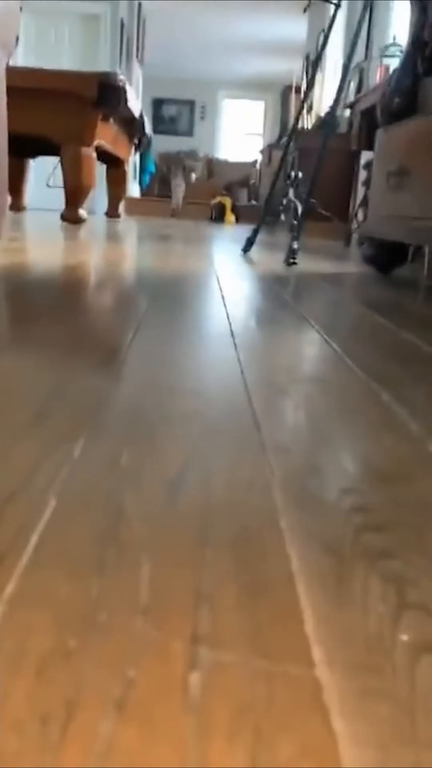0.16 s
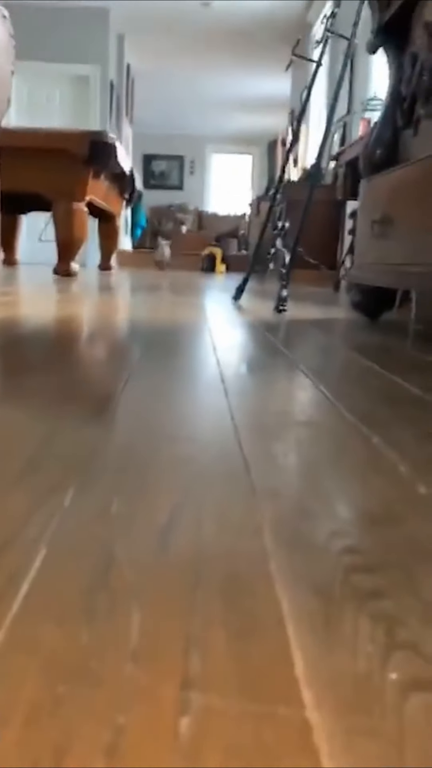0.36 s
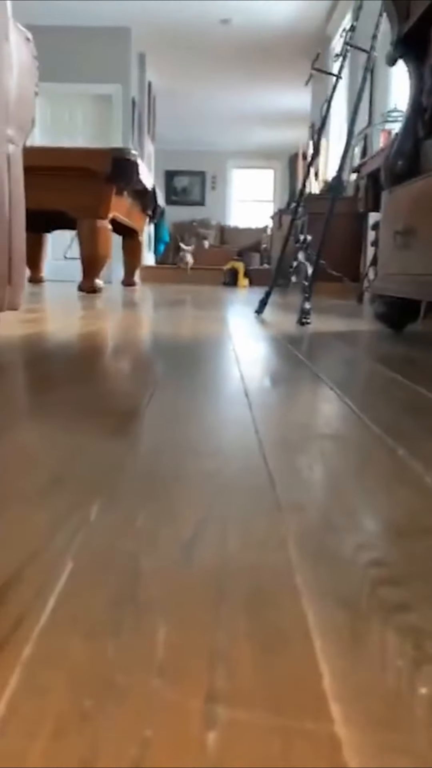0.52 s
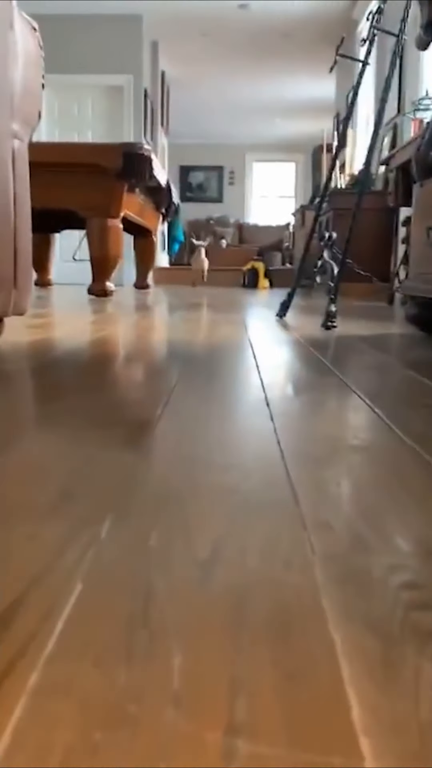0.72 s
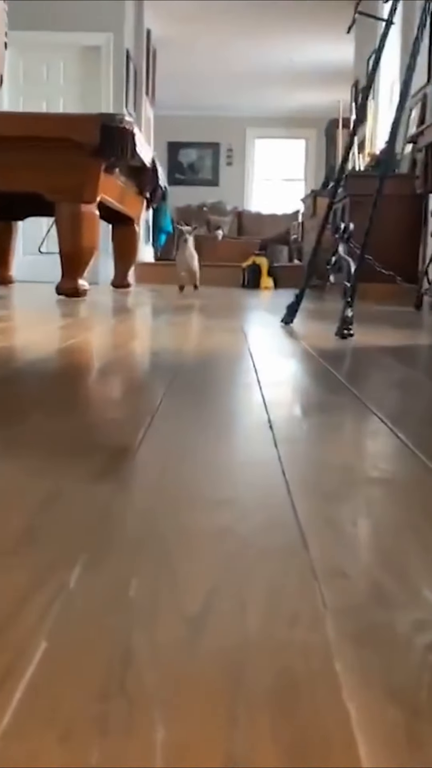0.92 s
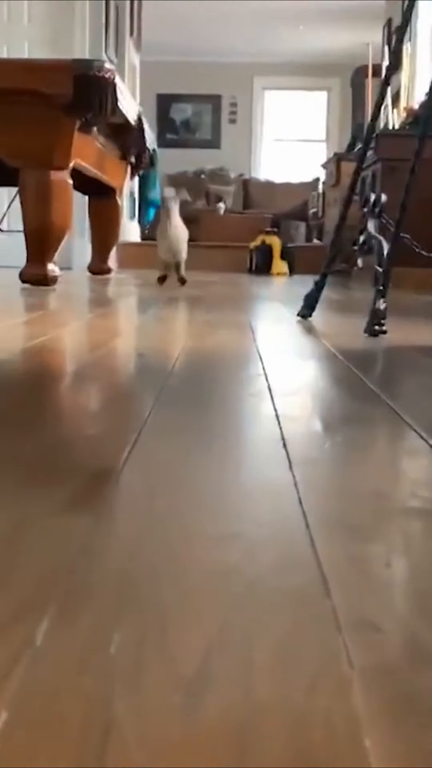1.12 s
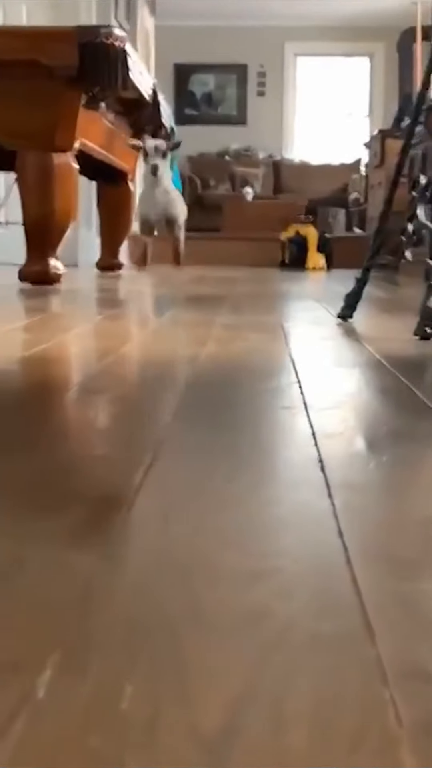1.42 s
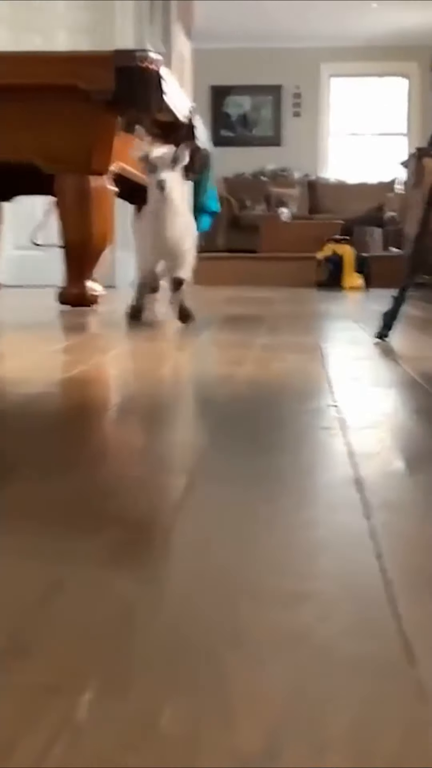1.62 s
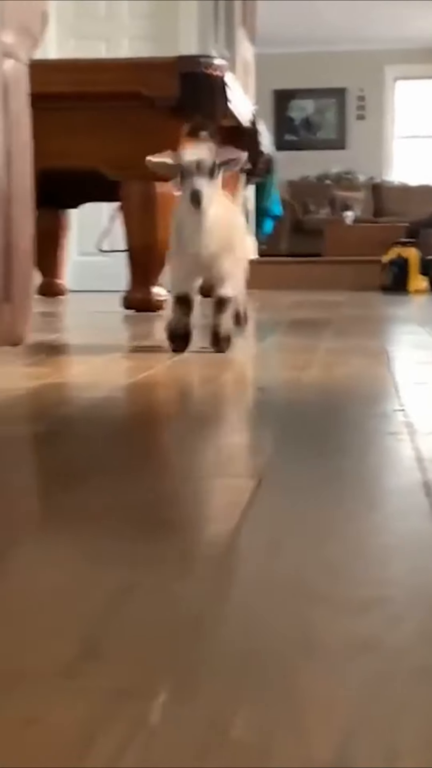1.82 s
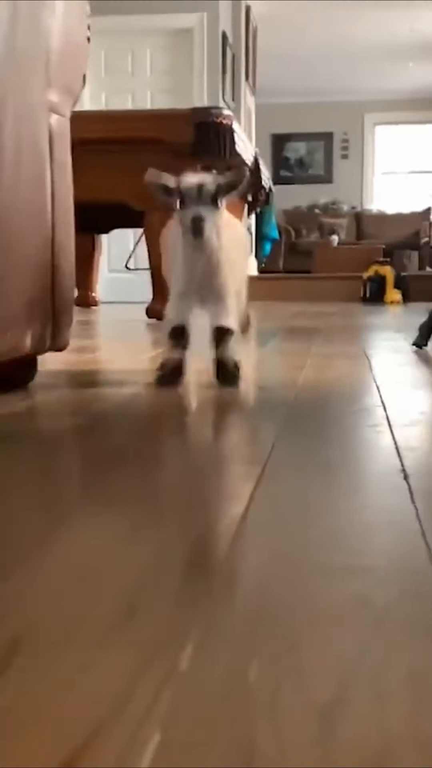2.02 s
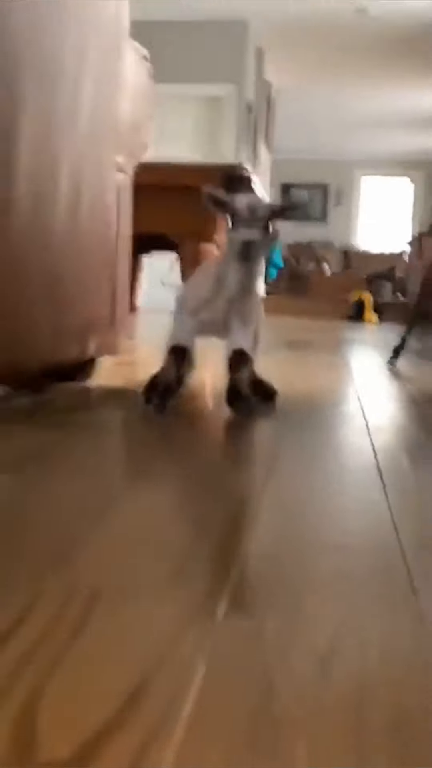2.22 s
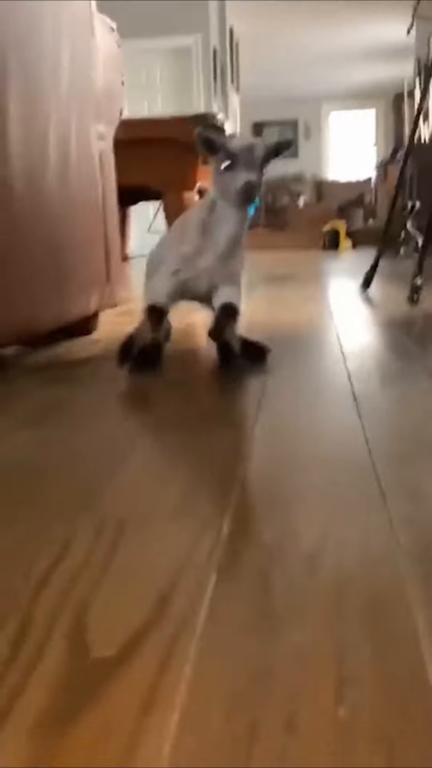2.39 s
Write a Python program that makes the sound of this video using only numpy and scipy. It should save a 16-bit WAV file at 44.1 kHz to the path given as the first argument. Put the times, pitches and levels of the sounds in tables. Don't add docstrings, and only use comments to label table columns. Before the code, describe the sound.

A small goat's hooves bound across a hardwood floor, in quick clustered clacks and hollow knocks, growing louder and nearer, then a faint last step; a sharp tick by the low phone microphone comes early, over quiet room hum.

```python
import sys
import numpy as np
from scipy import signal
from scipy.fft import rfft, irfft
from scipy.io import wavfile
from scipy.ndimage import uniform_filter1d

SR = 44100
rng = np.random.default_rng(int(sys.argv[2]) if len(sys.argv) > 2 else 0)


def volts(x):
    e = np.asarray(x, float) / 20
    return 10 ** e


def master(y):
    cut = np.clip(np.atleast_2d(y).T, -1, 1)
    pcm = np.round(cut * 32767)
    wavfile.write(sys.argv[1], SR, pcm.astype(np.int16))


N = 112454


def read(points, hz):
    f, value = np.transpose(points)
    return np.interp(np.log(hz + 1), np.log(f + 1), value, left=value[0], right=value[-1])


def evened(x):
    return x / np.sqrt(np.mean(x ** 2) + 1e-20)


def add(mix, s, sound):
    at = round(s * SR)
    sound = sound[max(-at, 0):]
    part = mix[max(at, 0):][:len(sound)]
    part += sound[:len(part)]


def coloured(gain):
    spectrum = rfft(rng.standard_normal(N))
    return evened(irfft(spectrum * gain(np.fft.rfftfreq(N, 1 / SR)), N))


def resonate(x, hz, width):
    r = np.exp(-np.pi * width / SR)
    return 2 * signal.lfilter([1 - r], [1, -r * np.exp(2j * np.pi * hz / SR)], x).real


LUMP_DB = 1.99
BLOOM_CYCLES = 2.56
EARLY_T60 = 0.049


def ringing(colour_db, t60, rise_s, early_db, size=24000):
    frames = size // 128 + 5
    a, b, lumps = rng.standard_normal((frames, 257, 3)).T
    lumps = uniform_filter1d(lumps, size=5, axis=0)
    lumps = evened(uniform_filter1d(lumps, size=6, axis=1))
    t = np.arange(frames) * 128 / SR
    level = evened(volts(colour_db))
    decay = volts(LUMP_DB * lumps - 60 * t / t60[:, None])
    z = (a + 1j * b) * level[:, None] * decay
    hz = np.fft.rfftfreq(512, 1 / SR)[:, None]
    z *= 1 - np.exp(-(t + 0.0071) * hz / BLOOM_CYCLES)
    x = signal.istft(z, nperseg=512, noverlap=384)[1][:size] / 22.6
    t = np.arange(size) / SR
    return x * (1 - np.exp(-t / rise_s)) * (1 + volts(early_db - 60 * t / EARLY_T60))


# frequency in Hz, level in dB.
HUM_COLOUR = [(24, -32), (40, 22.5), (404, 2), (542, 6), (1050, -5), (2020, -4), (4990, -46.5),
              (6550, -13.5), (9000, -30), (11700, -132), (19800, -120)]
HUM_DB = -49.5
# time in seconds, level in dB.
SHAKE = [(0.0, -39), (.09, -37.5), (.2, -49.5), (2.3, -42.5), (2.55, -75)]
SHAKE_HZ = 31
# time in seconds,
# level in dB.
HISS = [(0, -58), (.3, -59), (0.698, -66), (1.6, -73.5), (2.049, -58.5), (2.199, -48.5), (2.4, -54.5),
        (2.55, -56.5)]
# frequency in Hz, level in dB.
HISS_COLOUR = [(1470, -46), (2500, -9), (3480, 4), (4580, -2), (5410, 2), (13200, -12), (14000, -9)]


def room_tone():
    t = np.arange(N) / SR
    shake = coloured(lambda hz: (hz / SHAKE_HZ) ** 3 / (1 + (hz / SHAKE_HZ) ** 7))
    shake_level = volts(np.interp(t, *np.transpose(SHAKE)))
    hum = coloured(lambda hz: volts(read(HUM_COLOUR, hz)))
    swell_db = 2.1 * np.clip((t - 2.1) * 5, 0, 1)
    hiss = coloured(lambda hz: volts(read(HISS_COLOUR, hz)))
    hiss_level = volts(np.interp(t, *np.transpose(HISS)))
    return hiss_level * hiss + volts(HUM_DB + swell_db) * hum + shake_level * shake


# frequency in Hz, level in dB.
KNOCK = [(90, -7), (130, 4.5), (220, 1), (376, 1), (588, -2.5), (1220, -6.5), (1510, -24), (2600, -44.5)]
# frequency in Hz, level in dB.
CLACK = [(710, -24), (1200, -2), (1770, -3.5), (2680, -4), (3290, -11), (6490, -14), (12500, -29.5),
         (13300, -41), (14000, -84)]
# frequency in Hz, t60 in seconds.
ROOM = [(100, 0.32), (300, 0.57), (1000, 0.69), (3000, 0.69), (8000, 0.63), (13000, 0.2)]
BOARD_WIDTH, BOARD_DB = 0.087, 2
BOOM_HZ, BOOM_WIDTH_HZ, BOOM_T60, BOOM_RISE_S = 66.56, 27.3, 0.45, 0.021
KNOCK_RISE_S, KNOCK_EARLY_DB, KNOCK_TRIM_DB = 0.002, -6, -2
CLACK_RISE_S, CLACK_EARLY_DB = 0.0017, 6.5
GAIN_DB = -7


def hoof(slope_db, smear, knock_db, clack_db, boom_db, board_hz):
    hz = np.fft.rfftfreq(512, 1 / SR)
    t60, t = read(ROOM, hz), np.arange(24000) / SR
    board = BOARD_DB / (1 + ((hz - board_hz) / (BOARD_WIDTH * board_hz)) ** 2)
    knock = ringing(read(KNOCK, hz) + board, t60, KNOCK_RISE_S * smear, KNOCK_EARLY_DB)
    treble = slope_db * np.log2(np.maximum(hz / 4000, 1))
    clack = ringing(read(CLACK, hz) + treble, t60, CLACK_RISE_S * smear, CLACK_EARLY_DB)
    joists = np.zeros(len(t))
    for u, phase in zip((-0.61, -0.078, 0.752, 1.204), rng.random(4)):
        joist_hz = BOOM_HZ + BOOM_WIDTH_HZ * u
        joists += np.sin(2 * np.pi * (joist_hz * t + phase)) * volts(-9 * abs(u))
    boom = joists * (1 - np.exp(-t / BOOM_RISE_S)) * volts(-60 * t / BOOM_T60)
    strike = volts(KNOCK_TRIM_DB) * knock + volts(clack_db) * clack + volts(boom_db) * boom
    return volts(knock_db + GAIN_DB) * strike


# start in seconds, knock level in dB,
# clack in dB over the knock, boom in dB over the knock, board pitch in Hz.
EARLIER = [
    (-0.11, -16, -4, -0.5, 700),
]
# start in seconds, knock level in dB,
# clack in dB over the knock, boom in dB over the knock, board pitch in Hz.
LANDINGS = [
    (0.324, -14.5, -9, -10.5, 710),
    (0.524, -20.5, -3.5, -6, 294),
    (0.768, -20.5, -4.5, -18, 870),
    (0.972, -16, -3, 0.5, 1220),
    (1.2003, -12, -12, -1, 453),
    (1.434, -14, -5.5, -2, 294),
    (1.67, -9, -11, -5, 446),
    (1.9053, -11.5, -7.5, -24, 520),
    (2.119, -12.5, -9, -7, 750),
    (2.467, -30.5, -14, 3, 572),
]
# start in seconds, knock level in dB,
# clack in dB over the knock, boom in dB over the knock, board pitch in Hz.
FOLLOWERS = [(0.335, -12.5, -10.5, -33, 760), (0.355, -17.5, -10, -1, 250), (0.385, -28.5, 6.5, 8.5, 850),
             (0.401, -14.5, -11, -6, 251), (0.559, -18, -9, 1.5, 200), (0.805, -17.5, -3.5, 1, 890),
             (1.03, -20.5, 0, -1, 431), (1.207, -11, -11, -14, 470), (1.238, -17, -6.5, -0.5, 310),
             (1.255, -13.5, -10, -27, 470), (1.471, -9.5, -12.5, -26, 202), (1.503, -14.5, -17, -1, 195),
             (1.714, -11, -10, -33, 232), (1.741, -15, -14.5, -13, 434), (1.913, -9.5, -22, -12, 370),
             (1.954, -31, 4, -17, 291), (2.132, -24, -42, 2, 330), (2.18, -23, -13, -6, 322),
             (2.244, -29, -35, 0.5, 212.7)]
# time in seconds, treble slope in dB per octave,
# smear of the attack as a factor.
NEAR = [(0, -14, 3.63), (.6, -2.5, 7.13), (0.799, -12, 3.72), (1.1, -11, 3.2), (1.202, -5, 1.54),
        (1.498, -8.5, 3.55), (2.202, -10, 1.43)]
# frequency in Hz, width in Hz, level in dB.
BOARDS = [(95.3, 6, 7.5), (145, 16, -5.5), (202, 48, 0), (313, 20.4, 3.5), (375, 7.9, -1.5), (456.5, 14, 1),
          (539.3, 8.1, 5.5), (675, 11, 1.5), (922, 49, -2.5), (1180, 8.7, -2.5), (1410, 13.3, -2),
          (2340, 58, -14), (2650, 42, -5.5)]
BOARDS_DB = -2.5
FOLLOW_SMEAR = 2.2
LEAD_S = .001


def bounds():
    steps = np.zeros(N)
    when, slope_db, smear = np.transpose(NEAR)
    for k, (s, *strike) in enumerate([*EARLIER, *LANDINGS, *FOLLOWERS]):
        follows = k > len(LANDINGS)
        soft = np.interp(s, when, smear) * (FOLLOW_SMEAR if follows else 1)
        add(steps, s - LEAD_S * soft, hoof(np.interp(s, when, slope_db), soft, *strike))
    floor = sum(volts(db) * resonate(steps, hz, width) for hz, width, db in BOARDS)
    return steps + volts(BOARDS_DB) * floor


PING_SAG = 0.062


def ping(db, hz, t60, rise_s):
    t, d = np.arange(6000) / SR, rng.random(3)
    turns = hz * (t - PING_SAG * t ** 2 / t60)
    first = np.sin(2 * np.pi * (turns + d[0]))
    second = np.sin(2 * np.pi * (turns * (1.173 + 0.071 * d[1]) + d[2]))
    grit = resonate(rng.standard_normal(len(t)), hz, .5 * hz)
    grit = evened(resonate(grit, hz, .5 * hz))
    swell = 1 - np.exp(-(t / rise_s) ** 2)
    return volts(db - 60 * t / t60) * swell * (first + 0.15 * second + 0.2 * grit)


# start in seconds, peak level in dB,
# pitch in Hz, t60 in seconds.
THUMPS = [(0.031, -25, 60, 0.17), (.04, -29, 148.4, 0.21), (0.621, -25, 148, 0.14), (1.121, -29, 148, 0.18),
          (1.503, -15, 298, .05), (1.707, -15.5, 269, 0.11), (.342, -15.5, 225, 0.13),
          (.405, -16.5, 220, 0.14), (1.010, -23.5, 455, 0.19), (1.206, -12.5, 456, 0.055),
          (1.236, -12, 335, 0.054), (1.286, -13.5, 319, 0.058), (1.441, -4.5, 191, 0.057),
          (1.468, -9, 240, 0.04), (1.486, -13, 360, 0.066), (1.490, -18, 198.8, 0.27),
          (1.674, -14.5, 432, 0.085), (1.690, -14.5, 216.6, 0.11), (1.736, -11, 419, 0.058),
          (1.776, -14.5, 438, 0.054), (1.786, -21, 301.6, 0.062), (1.913, -7, 568, 0.055),
          (1.920, -5.5, 389, 0.066), (1.932, -9.5, 311.4, 0.089), (1.968, -23, 411, 0.096),
          (1.988, -12.5, 249, 0.075), (2.146, -9, 324, 0.067), (2.13, -15, 195, 0.1),
          (2.172, -17, 540, 0.078)]
# start in seconds, peak level in dB,
# pitch in Hz, t60 in seconds.
PINGS = [(.3355, -3.5, 805, 0.016), (.345, -17, 827, 0.033), (.354, -16, 614, 0.03),
         (.767, -19, 1254, 0.03), (.766, -27, 850, .05), (.785, -28.5, 919, .12), (.808, -21.5, 918, 0.097),
         (.323, -23, 746, 0.035), (0.972, -23, 1196, 0.056), (.9735, -13, 2140, 0.021),
         (1.1999, -10, 1220, 0.019), (1.2062, -3.5, 2180, 0.014), (1.2073, -7.5, 2810, 0.017),
         (1.214, -16.5, 1255, .03), (1.251, -18, 1250, 0.019), (1.2567, -11, 2645, 0.015),
         (1.259, -16, 1130, 0.022), (1.27, -12.5, 1260, .025), (1.434, -13.5, 757, 0.032),
         (1.434, -19, 1240, 0.019), (1.4755, -9, 732, 0.018), (1.492, -14, 780, 0.017),
         (1.665, -17, 984, 0.022), (1.673, -18, 960, 0.024), (1.6755, -12, 4330, 0.013),
         (1.729, -8, 920, 0.019), (1.737, -6.5, 1141, 0.016), (1.751, -10.5, 1110, 0.025),
         (1.916, -16, 2730, .02), (1.961, -24.5, 2440, 0.033), (2.1195, -6, 823, .024),
         (2.122, -15, 2230, 0.032), (2.129, -16, 1520, .02), (2.136, -7.5, 664, 0.022),
         (2.181, -24.5, 3920, 0.034), (2.185, -20, 2250, 0.033), (2.183, -20.5, 1695, 0.04),
         (2.4685, -33, 1690, 0.016), (2.47, -33.5, 610, 0.036)]
THUMP_RISE_CYCLES, PING_RISE_S = 2.34, 0.0022
ECHO_DB = -5
BLOW_T60 = 0.11


def clear_hits():
    direct, blows = np.zeros(N), np.zeros(N)
    hz = np.fft.rfftfreq(512, 1 / SR)
    fade = volts(-60 * np.arange(6000) / SR / BLOW_T60)
    pings = [(*row, PING_RISE_S) for row in PINGS]
    thumps = [(*row, THUMP_RISE_CYCLES / row[2]) for row in THUMPS]
    for s, *row in pings + thumps:
        hit = ping(*row)
        add(direct, s, hit)
        add(blows, s, hit * fade)
    tail = ringing(0 * hz, read(ROOM, hz), 0.005, -30)
    low_tail = signal.lfilter([.25], [1, -.75], tail)
    tail = tail / np.sqrt(2 * np.mean(low_tail ** 2) * len(tail) * 4)
    return direct + volts(ECHO_DB) * signal.fftconvolve(blows, tail)[:N]


# start in seconds, level in dB, t60 in seconds.
GRIT = [(.0595, -39.5, .02), (.0415, -55, .015), (1.2, -37, .1), (1.432, -43, 0.19), (1.666, -30.5, 0.21),
        (1.726, -43, 0.37), (1.903, -31.5, 0.097), (1.913, -45, 0.14), (2.119, -41, 0.075),
        (2.180, -42, 0.039), (2.188, -40, 0.057)]
# frequency in Hz, level in dB.
GRIT_COLOUR = [(2000, -6), (4500, 3.5), (8000, -0.5), (10300, -18.5), (13000, -15)]


def sprays():
    level, t = np.zeros(N), np.arange(12000) / SR
    for s, db, t60 in GRIT:
        add(level, s, volts(db - 60 * t / t60) * np.minimum(t / 0.00057, 1))
    return level * coloured(lambda hz: volts(read(GRIT_COLOUR, hz)))


# frequency in Hz, level in dB.
TICK = [(88, -27), (150, -3.5), (1280, -5), (2400, 2.5), (5130, -18), (6320, 0), (8570, -22.5),
        (12800, -66), (14000, -52)]
# frequency in Hz, level in dB.
TICK_TAIL = [(240, -56), (400, -23), (500, -27), (1530, 0), (1650, -6), (2350, -5), (6670, -1),
             (13200, -23), (14000, -32)]
TICK_S, TICK_DB, TICK_SWEEP = .1062, -2, 0.66
TICK_TAIL_DB, TICK_T60 = -29.5, 0.4
BUMP_DB, BUMP_HZ, BUMP_T60, BUMP_LAG_S = -16.5, 52.6, 0.11, 0.009


def tick():
    hz, t = np.fft.rfftfreq(4096, 1 / SR), np.arange(24000) / SR
    cepstrum = irfft(np.log(volts(read(TICK, hz))))
    causal = np.exp(rfft(cepstrum * np.r_[1, 2 * np.ones(2047), 1, np.zeros(2047)]))
    sweep = TICK_SWEEP * (np.log((hz + 60) / 3000) - hz / 9000)
    snap = np.roll(irfft(causal * np.exp(-2j * np.pi * sweep)), 30)
    bins = np.fft.rfftfreq(512, 1 / SR)
    tail = ringing(read(TICK_TAIL, bins), TICK_T60 + 0 * bins, 0.0015, 3.8)
    bump = np.sin(2 * np.pi * BUMP_HZ * (t - BUMP_LAG_S)) * volts(BUMP_DB - 60 * t / BUMP_T60)
    out = volts(TICK_TAIL_DB) * tail + bump * np.minimum(t / 0.0135, 1) ** 2
    add(out, 0, volts(TICK_DB) * snap[:2000] / abs(snap).max())
    return out


SCUFF_S, SCUFF_LEN_S, SCUFF_DB, SCUFF_HZ, SCUFF_WIDTH_HZ = 0.506, 0.16, -37.5, 3250, 1070


def scuff():
    u = (np.arange(N) / SR - SCUFF_S) / SCUFF_LEN_S
    grit = coloured(lambda hz: 1 / (1 + ((hz - SCUFF_HZ) / SCUFF_WIDTH_HZ) ** 4))
    return volts(SCUFF_DB) * grit * np.clip(6 * u, 0, 1) * volts(-12 * np.clip(u, 0, 9) ** 1.05)


def scene():
    mix = room_tone() + bounds() + clear_hits() + sprays() + scuff()
    add(mix, TICK_S - 40 / SR, tick())
    return mix[None]


def roll_off(x):
    return signal.sosfilt(signal.butter(12, 14040, fs=SR, output="sos"), x)


def record(dry):
    hz = np.fft.rfftfreq(N, 1 / SR)
    shelf = volts(-28 * np.clip((hz - 13100) / 300, 0, 1))
    mix = irfft(rfft(dry) * shelf, N)
    return roll_off(mix)


dry = scene()
out = record(dry)
master(out)
```